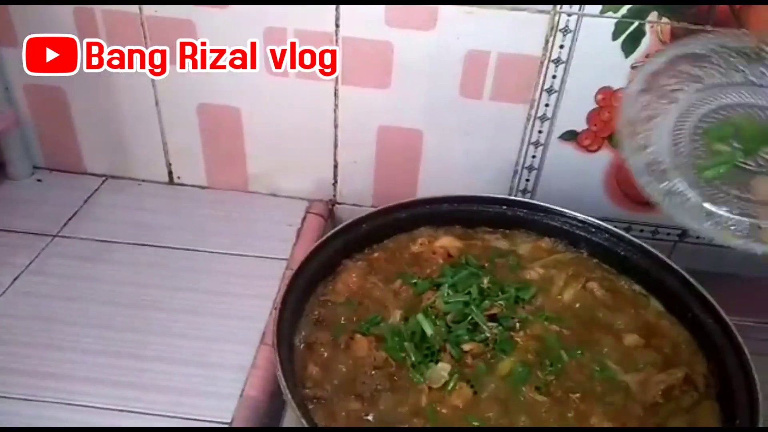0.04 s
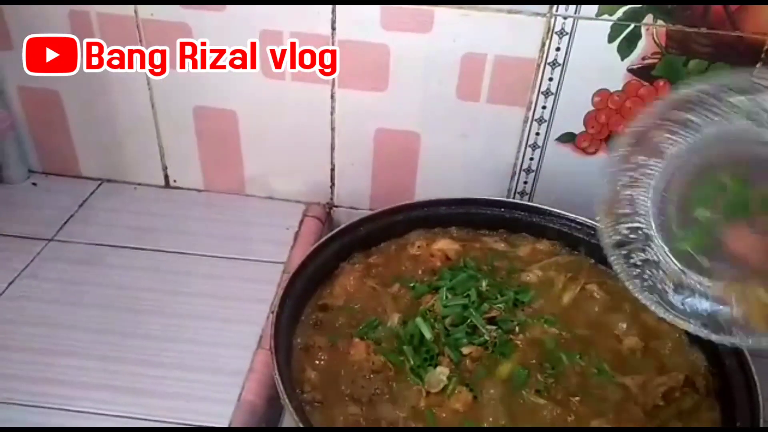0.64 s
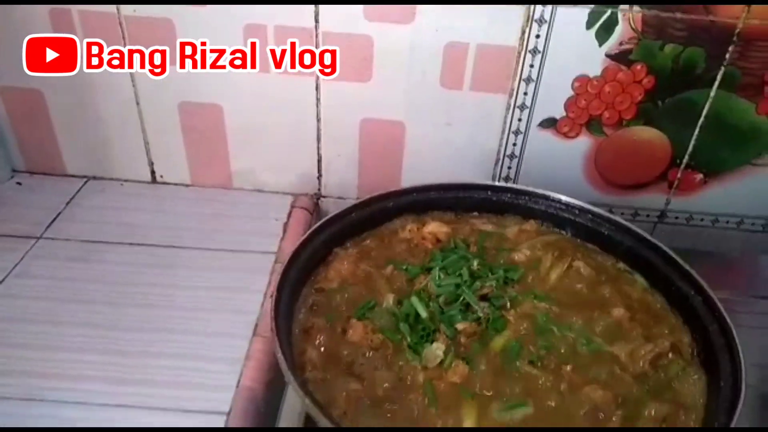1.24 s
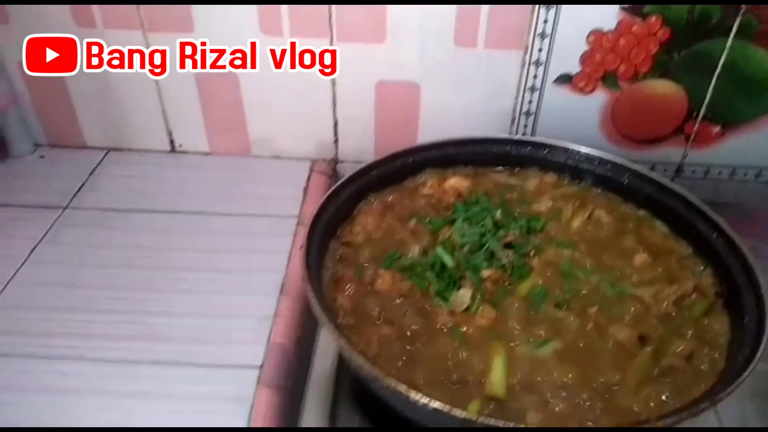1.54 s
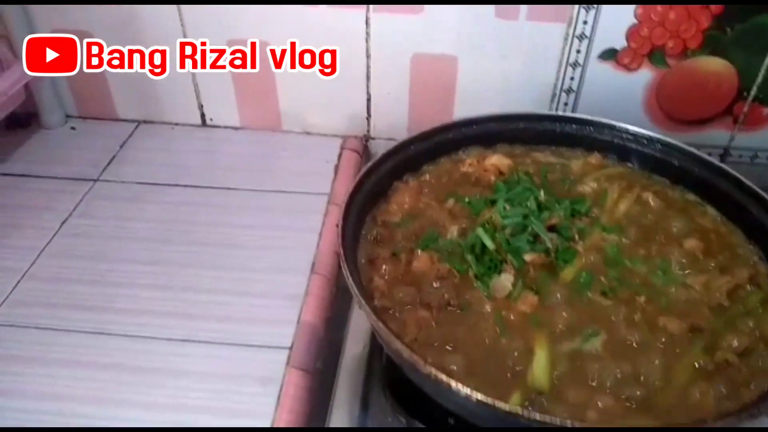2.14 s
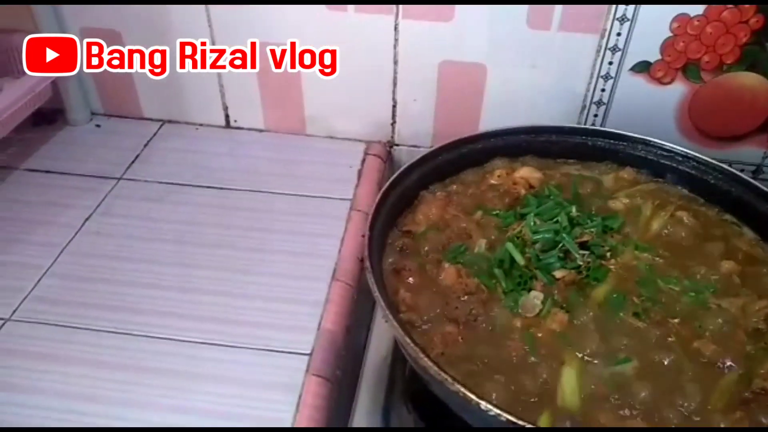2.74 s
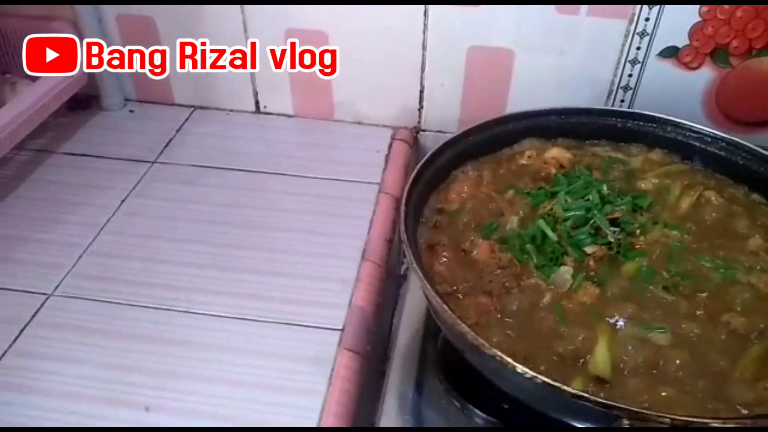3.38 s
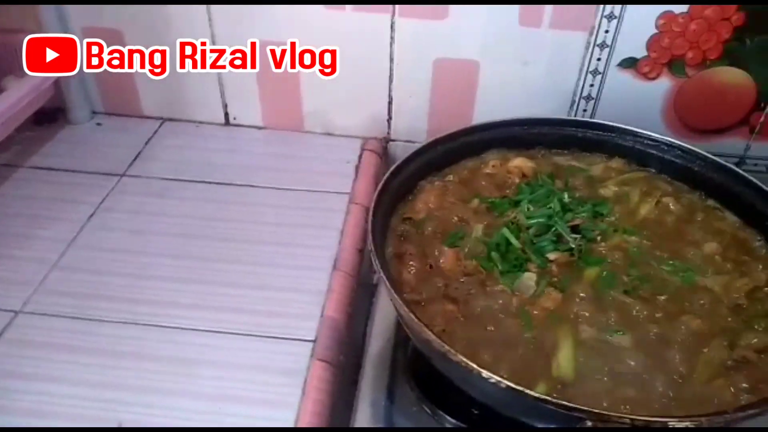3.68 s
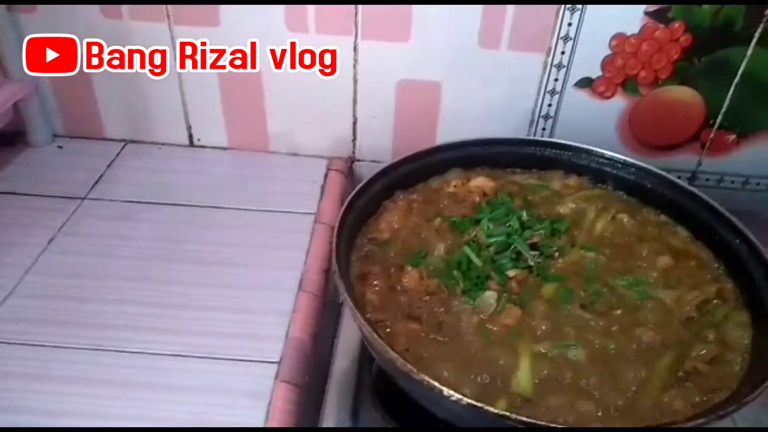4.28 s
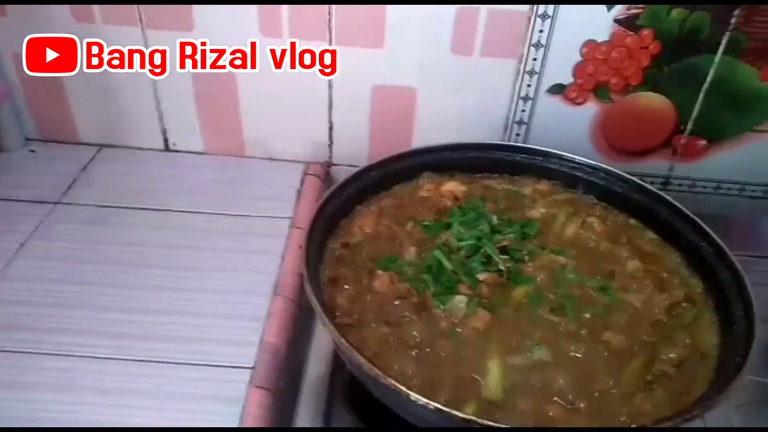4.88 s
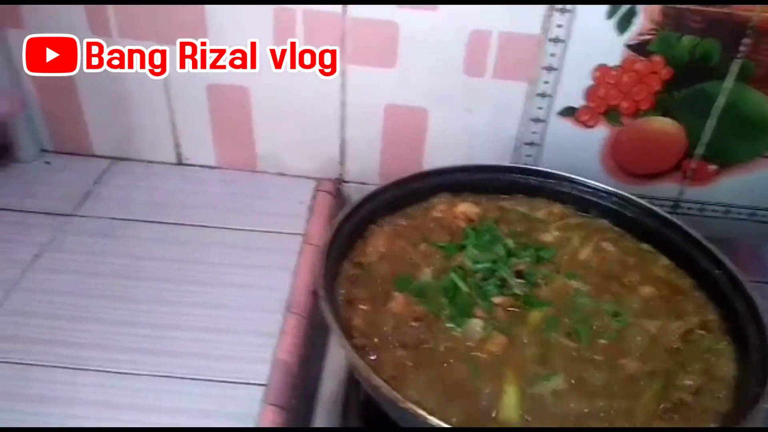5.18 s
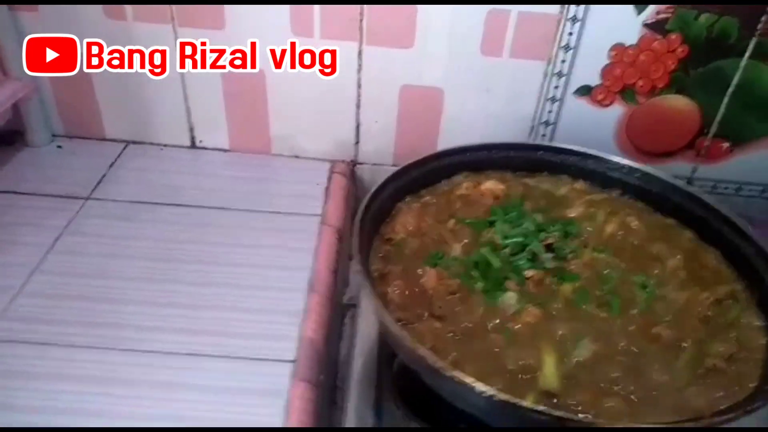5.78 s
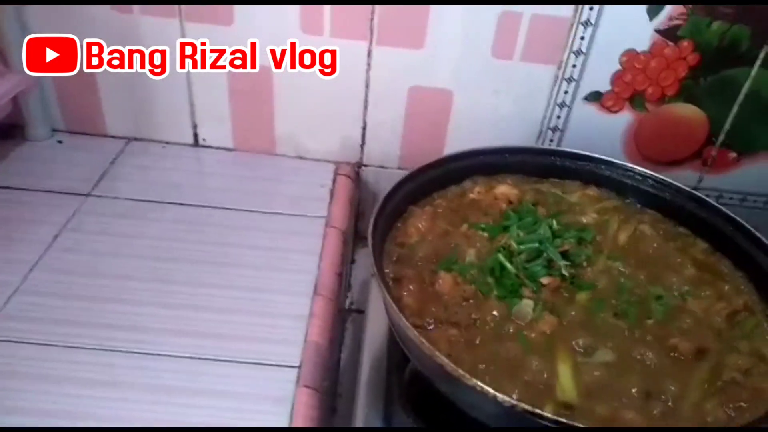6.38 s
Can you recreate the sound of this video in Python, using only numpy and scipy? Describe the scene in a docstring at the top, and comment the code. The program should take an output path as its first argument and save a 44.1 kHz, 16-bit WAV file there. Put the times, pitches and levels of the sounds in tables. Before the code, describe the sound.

Thick stew simmers in a frying pan, with soft pops and occasional bright spits over the faint hiss of a gas burner. About two seconds in, a glass bowl is set down loudly among kitchenware, clinking, scraping and rattling to rest. The bubbling carries on, with deeper gurgles near the end. A close hand-held microphone rumbles faintly in a small tiled kitchen.

```python
"""A gas burner hisses under a thick stew that pops, gurgles and spits in a frying pan.
Each bubble is a puff of noise through its cavity; each spit is a bright snap. Two seconds in, a
pressed-glass bowl is put down among kitchenware: it clinks, bounces, scrapes along its patterned rim
and rattles to rest, every contact ringing the glass. The small tiled kitchen adds a short reverb,
and the close, hand-held microphone rumbles faintly."""
import sys
import numpy as np
from scipy import signal
from scipy.fft import rfft, irfft, next_fast_len
from scipy.io import wavfile
from scipy.ndimage import map_coordinates

SR = 44100
rng = np.random.default_rng(int(sys.argv[2]) if len(sys.argv) > 2 else 0)


def transcribe(u):
    """Save the signal u as a 16-bit wav file named by the first command-line argument.

    u: samples, shape (n,) or (channels, n), limited to [-1, 1]; the rate is SR.
    q: integer samples, one column per channel.
    """
    v = np.clip(np.atleast_2d(u).T, -1, 1)
    q = np.round(v * 32767).astype(np.int16)
    wavfile.write(sys.argv[1], SR, q)


N = 283122


def amp(db):
    """Decibels to gain."""
    return 10 ** (np.asarray(db) / 20)


def unit(x):
    """x at rms 1."""
    return x / np.sqrt(np.mean(x ** 2) + 1e-20)


def curve(points, hz):
    """Breakpoints (frequency [Hz], value) joined on a log axis and read at hz."""
    freqs, values = np.transpose(points)
    return np.interp(np.log(hz + 1), np.log(freqs + 1), values)


def wobble(rate):
    """Smooth random modulation, with rate knots a second."""
    return map_coordinates(rng.standard_normal(int(N * rate / SR) + 4), [np.arange(N) * rate / SR])


def filtered(x, response):
    """x through an EQ whose gain is response(hz)."""
    n = x.shape[-1]
    padded = next_fast_len(n + n // 8)
    return irfft(rfft(x, padded) * response(np.fft.rfftfreq(padded, 1 / SR)), padded)[..., :n]


def panned(pan_db):
    """Left and right gains; positive leans left."""
    return amp(np.array([[pan_db], [-pan_db]]) / 2)


def add(track, start, sound):
    """Mix a sound into a stereo track at start seconds."""
    i = int(np.clip(round(start * SR), 0, N - 1))
    track[:, i:i + sound.shape[-1]] += sound[..., :N - i]


# Stereo image of the noise beds: (frequency [Hz], left-right correlation [-1 to 1])
STEREO_IMAGE = [(60, 0.98), (180, 0.95), (550, 0.89), (1650, 0.59), (4970, -0.11), (15000, 0.038)]
def noise_bed(eq):
    """Shaped stereo noise at rms 1, nearly mono in the bass and wide in the treble."""
    def mid_side_gains(hz):
        angle = np.arccos(np.clip(curve(STEREO_IMAGE, hz), -1, 1)) / 2
        return amp(curve(eq, hz)) * [np.cos(angle), np.sin(angle)]
    mid, side = filtered(rng.standard_normal((2, N)), mid_side_gains)
    return unit(np.array([mid + side, mid - side]))


# Reverb decay of the kitchen: (frequency [Hz], t60 [s])
ROOM_DECAY = [(200, .33), (2000, .3), (4000, .27), (7000, .25), (14000, .16)]
def kitchen(dry, wet_db):
    """Add the reflections of the tiled walls, whose treble dies first."""
    hz, t, spectrum = signal.stft(rng.standard_normal((2, SR // 2)), SR, nperseg=256)
    decay = amp(-60 * t / curve(ROOM_DECAY, hz)[:, None])
    tail = signal.istft(spectrum * decay, SR, nperseg=256)[1]
    tail = np.pad(tail / np.linalg.norm(tail[0]), ((0, 0), (SR // 300, 0)))  # pre-delay
    return dry + amp(wet_db) * signal.fftconvolve(dry, tail, axes=1)[:, :N]


# EQ of the handling rumble: (frequency [Hz], gain [dB])
RUMBLE_EQ = [(20, -16), (45, -19), (68, 5), (85, -10.5), (130, -13), (300, -59)]
# Soft bumps of the microphone: (time [s], length [s], level [dB])
MIC_BUMPS = [(0.319, 0.14, -52), (0.595, 0.2, -54), (0.96, 0.19, -63), (4.8, 0.18, -56), (5.51, .12, -62)]
def handling():
    """The hand's tremor makes a faint rumble that swells as it moves the microphone."""
    t = np.arange(N) / SR
    bumps = sum(amp(db) * np.sin(np.pi * np.clip((t - start) / length, 0, 1)) ** 2
                for start, length, db in MIC_BUMPS)
    tremor = amp(-68.5 + 3.5 * wobble(8.9))
    return (tremor + bumps) * noise_bed(RUMBLE_EQ) * panned(1.5)


# EQs of the low flame and the gas hiss: (frequency [Hz], gain [dB])
FLAME_EQ = [(60, -35), (112, 2.5), (150, -5), (220, -0.5), (300, 1), (390, -6.5), (480, -4), (750, -8.5),
            (1200, -33), (3000, -49)]
HISS_EQ = [(2000, -31.5), (3800, -15), (4900, -6.5), (5800, -2), (7500, -4.5), (8800, -2.5), (10300, -5),
           (12500, -5.5), (15500, -8)]
def burner(flame_db=-60.5, hiss_db=-57):
    """The gas flame flutters low under a constant, flickering hiss."""
    flame = amp(flame_db + 1.2 * wobble(16)) * noise_bed(FLAME_EQ)
    hiss = amp(hiss_db + 2.04 * wobble(3.937) + 2.1 * wobble(37)) * noise_bed(HISS_EQ)
    return flame * panned(1.1) + hiss * panned(-0.69)


# Bright EQ of spitting sauce: (frequency [Hz], gain [dB])
SPIT_EQ = [(1500, -20), (4500, -18.5), (6000, -8), (8500, 2.5), (11000, -13.5), (15000, -18)]
def spit_tone(x):
    """Give x the thin, sharp tone of spitting sauce, at rms 1."""
    return unit(filtered(x, lambda hz: amp(curve(SPIT_EQ, hz))))


def sizzle(level_db, count=1500):
    """Countless tiny spits around the edge of the pan, one impulse each."""
    onsets = rng.integers(0, N, count)
    impulses = np.array([np.bincount(onsets, rng.standard_normal(count), N) for side in range(2)])
    return amp(level_db) * spit_tone(impulses) * panned(-15.0)


# Ticks that stand out of the sizzle: (time [s], level [dB], pan [dB])
SPIT_CUES = [(0.0285, -21.5, -3.5), (0.5163, -41, -15), (0.657, -36, -12), (1.5393, -27, -9.5),
             (1.7252, -34, -19.5), (1.7373, -33, -23.5), (1.819, -36, -20), (3.026, -40, 3.5),
             (3.891, -35.5, -20), (4.5712, -36.5, -10), (4.9585, -43.5, 12), (5.3447, -35.5, -24),
             (6.0651, -37.5, -4)]
def spits():
    """Sharp snaps with a faint tail of fizz, like sauce spitting on the hot rim."""
    out, t = np.zeros((2, N)), np.arange(SR // 10) / SR
    snap = amp(-2.5 - 60 * t / 0.019)
    fizz = amp(-17.0 - 60 * t / 0.14)
    for start, db, pan_db in SPIT_CUES:
        spray = spit_tone(rng.standard_normal((2, len(t))))
        add(out, start, amp(db) * unit(panned(pan_db)) * spray * (snap + fizz))
    return out


def cavity(noise, pitch_hz, width):
    """Noise through a bubble's resonance, at rms 1; width is a fraction of the pitch."""
    return unit(filtered(noise, lambda hz: 1 / (1 + ((hz - pitch_hz) / (width * pitch_hz)) ** 2)))


# Deep bubbles at the bottom of the pan: (time [s], level [dB], pitch [Hz])
GURGLE_CUES = [(1.05, -45.5, 293), (4.556, -46, 295), (4.712, -49, 270), (5.133, -47, 254),
               (5.287, -44, 280), (5.559, -43, 205), (5.775, -37.5, 296), (5.869, -43, 264),
               (6.055, -46.5, 308), (6.341, -44, 323)]
def gurgles(t60=0.18, attack=0.0096):
    """Large bubbles throb inside the thick sauce, swelling softly."""
    out, t = np.zeros((2, N)), np.arange(SR // 5) / SR
    for start, db, pitch_hz in GURGLE_CUES:
        throb = cavity(rng.standard_normal(len(t)), pitch_hz, width=0.081)
        envelope = amp(db - 3.0 - 60 * t / t60) * (1 - np.exp(-t / attack))
        add(out, start, envelope * throb)
    return out


def random_bubbles(boil_db, spread_db, centre_hz, count):
    """Scattered bubbles whose level rides the boil: (time [s], level [dB], pitch [Hz])."""
    onsets = rng.integers(0, N, count)
    size, detune = rng.standard_normal((count, 2)).T
    db = boil_db[onsets] + spread_db * np.clip(size, -2, 2)
    return np.column_stack([onsets / SR, db, centre_hz * np.exp(.27 * detune)])


def burst(bubbles, t60, width, attack):
    """Each bursting bubble is a short puff through the resonance of its cavity."""
    out, t = np.zeros((2, N)), np.arange(SR // 25) / SR
    for start, db, pitch_hz in bubbles:
        mid, side = cavity(rng.standard_normal((2, len(t))), pitch_hz, width)
        envelope = amp(db - 60 * t / t60) * (1 - np.exp(-t / attack))
        add(out, start, envelope * np.array([mid + 0.46 * side, mid - 0.77 * side]))
    return out


# The loudest bubbles bursting: (time [s], level [dB], pitch [Hz])
POP_CUES = [(0.2157, -37, 1860), (0.354, -44.5, 1850), (0.5015, -37.5, 2460), (0.7451, -42, 1610),
            (0.9073, -47, 1740), (1.486, -42.5, 1820), (1.737, -43, 1560), (2.9983, -41, 1840),
            (3.0735, -39.5, 2150), (3.175, -44, 2140), (3.2053, -45.5, 1540), (3.2525, -39.5, 1480),
            (3.6766, -43.5, 2094), (3.7938, -40, 2120), (4.0364, -46, 1920), (4.146, -42, 1220),
            (4.2272, -38, 2250), (4.2481, -36.5, 2460), (4.2956, -42, 2410), (4.786, -44, 1440),
            (5.1148, -42.5, 2500), (5.1705, -37.5, 2300), (5.2782, -40, 2230), (6.0433, -40, 1680),
            (6.1815, -40.5, 2200), (6.279, -42, 1730), (6.3895, -39.5, 1620)]
# EQ of the seething bed: (frequency [Hz], gain [dB])
SEETHE_EQ = [(300, -23.5), (800, -2), (1500, -3.5), (2100, -3), (2800, -7.5), (4000, -4.5), (5000, -20),
             (8000, -42)]
def stew(rise_db_per_s=0.12):
    """Big pops over small bubbles, crackle and seething that creep up as the stew nears the boil."""
    boil_db = -58.5 + rise_db_per_s * np.arange(N) / SR + 0.55 * wobble(3.146)
    big = amp(-3.5) * burst(POP_CUES, t60=0.064, width=0.21, attack=0.0007)
    small_bubbles = random_bubbles(boil_db, spread_db=2.5, centre_hz=1580, count=480)
    small = amp(3.0) * burst(small_bubbles, t60=0.041, width=0.14, attack=0.00068)
    fine_bubbles = random_bubbles(boil_db, spread_db=6.5, centre_hz=2300, count=260)
    crackle = amp(-0.8) * burst(fine_bubbles, t60=0.011, width=0.39, attack=0.00036)
    seethe = amp(boil_db - 3.5 + 0.88 * wobble(25)) * noise_bed(SEETHE_EQ)
    return big + small + crackle + seethe


# Clustered modes of the bowl, damped by the hand: (frequency [Hz], level [dB], t60 [s])
GLASS_MODES = [(1730, -2, .06), (1764, -2, .12), (1984, -11, .14), (2197, -13, .14), (2275, -14, .13),
               (2333, -11, .16), (2482, -13, .12), (2672, -9, .16), (2786, -11, .14), (3865, 0, .14),
               (4517, -11, .14), (6298, -12, .12), (7090, -6, .1), (7157, -1, .08), (7230, -5, .05),
               (9090, -16, .1), (10230, -5, .03), (10300, -3, .08), (10357, 0, .12), (10900, -3, .035),
               (10957, -2, .11), (12100, -17, .03), (13960, -9, .04), (14380, -4, .03), (14430, -10, .06)]
# EQ of the dense, quickly damped clatter of glass and kitchenware: (frequency [Hz], gain [dB])
CLATTER_EQ = [(80, -47.5), (250, 1), (500, -1.5), (750, 10.5), (1200, 1.5), (1750, 0), (2500, 6),
              (3300, -0.5), (4300, -2), (5200, -8.5), (8000, -9), (9700, -13.5), (10700, 3), (11700, -14.5),
              (13000, -11.5), (15500, -40)]
def strike(contacts, clatter_t60, clatter_db, ring_db, scatter_db):
    """Each contact gives a short clatter and rings the glass modes at new strengths and phases."""
    out, t = np.zeros((2, N)), np.arange(SR // 5) / SR
    mode_hz, mode_db, mode_t60 = np.transpose(GLASS_MODES)
    decays = amp(mode_db[:, None] - 60 * t / mode_t60[:, None])
    bloom = 1 - np.exp(-t / 0.00021)  # the ring takes a moment to spread around the bowl
    modes = decays * bloom * np.exp(2j * np.pi * mode_hz[:, None] * t)
    clatter_envelope = (amp(-60 * t / clatter_t60) * (1 - np.exp(-t / 0.00087)))[:SR // 12]
    per_mode = (2, len(mode_hz))
    for start, db, knock_db, treble_db, pan_db in contacts:
        # heavy contacts knock, hard ones are bright, light ones only rasp in the mids
        hit_eq = [(900, knock_db), (1700, 3.5 + 0.17 * knock_db), (2400, 0),
                  (3800, 0.56 * treble_db), (5500, treble_db)]
        noise = rng.standard_normal((2, len(clatter_envelope)))
        clatter = filtered(noise, lambda hz: amp(curve(CLATTER_EQ, hz) + curve(hit_eq, hz)))
        strengths = amp(curve(hit_eq, mode_hz) + scatter_db * rng.standard_normal(per_mode))
        phases = np.exp(2j * np.pi * rng.random(per_mode))
        ring = ((strengths * phases) @ modes).imag
        add(out, start, amp(db + clatter_db) * panned(pan_db) * clatter * clatter_envelope)
        add(out, start, amp(db + ring_db) * panned(pan_db) * ring)
    return out


def scrape(start, length, force_db, knock_db, treble_db, ring_db, pan_db):
    """The patterned rim chatters over the kitchenware as the push eases off, then lets go."""
    ridges_per_s, ease_db_per_s = 270, 93
    release_s, release_db_per_s = .06, 449.5
    count = int((length + release_s) * ridges_per_s)
    jitter, catch = rng.random((count, 2)).T
    t = (np.arange(count) + jitter) / ridges_per_s
    push_db = force_db - ease_db_per_s * t - release_db_per_s * np.maximum(t - length, 0)
    ridge_db = push_db + 1.5 * (2 * catch - 1)  # some ridges catch harder than others
    contacts = [(start + delay, db, knock_db, treble_db, pan_db) for delay, db in zip(t, ridge_db)]
    return strike(contacts, clatter_t60=0.01, clatter_db=11, ring_db=ring_db, scatter_db=2.0)


# Clear hits of the bowl: (time [s], level [dB], knock [dB], treble [dB], pan [dB])
BOWL_HITS = [(1.9755, -1, -23, 2, -0.5), (1.9795, -2.5, -11, -4, 3.5), (2.0185, -4.5, -13, 4.5, 0.5),
             (2.0387, -6, -19, 1, 0.5), (2.0511, -11, -12, -22, -5), (2.1121, -24.5, -8, 5.5, 3.5),
             (2.183, -21, -46, -22.5, -17), (2.2172, -15, -43, -15.5, -2.5), (2.2264, -24, -23, -28, -9),
             (2.2665, -13, -36, -16.5, -7.5), (2.2935, -23.5, -30, 12.5, -3.5), (2.2988, -7, -49, -11, -3),
             (2.3095, -7, -28, -12, -3.5), (2.371, -18.5, -20, -3.5, -3), (2.4335, -12, -25, -10, -10.5),
             (2.4401, -12, -24, 3, -2), (2.4595, -9.5, -23.5, 1.5, -8.5)]
# Slides of its rim: (time [s], length [s], force [dB], knock [dB], treble [dB], ring [dB], pan [dB])
RIM_SCRAPES = [(1.981, .005, -16.5, -9, 8, -15, -5), (2.03, 0.028, -20.5, -6, 0, -14, -6),
               (2.175, 0.046, -22.5, -23, -10.5, -18.5, -1), (2.272, .05, -16, -23, -6.5, -17.5, -2.5),
               (2.367, .008, -31.5, -30, -1, -19, 0.5), (2.441, 0.1, -13, -15, -2, -12.5, -3)]
def bowl():
    """The glass bowl clinks and bounces, scrapes, and rattles to rest."""
    clinks = strike(BOWL_HITS, clatter_t60=0.036, clatter_db=1.5, ring_db=-15.0, scatter_db=1.4)
    return clinks + sum(scrape(*cue) for cue in RIM_SCRAPES)


def scene():
    """Pan and bowl in the kitchen reverb, over the dry burner and handling rumble."""
    bubbling = kitchen(stew() + gurgles(), wet_db=-6.5) * panned(-1.2)
    spitting = kitchen(spits() + sizzle(level_db=-65.5), wet_db=-6.0)
    glass = kitchen(bowl(), wet_db=-7)
    return burner() + handling() + bubbling + spitting + glass


def record(dry):
    """Soft saturation rounds off the loudest clinks; a brick-wall low-pass trims the top."""
    cutoff_hz = 15550
    saturated = dry / (1 + np.abs(dry) ** 4) ** (1 / 4)
    return filtered(saturated, lambda hz: hz < cutoff_hz)


dry = scene()
out = record(dry)
transcribe(out)
```